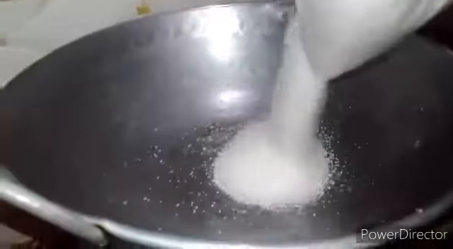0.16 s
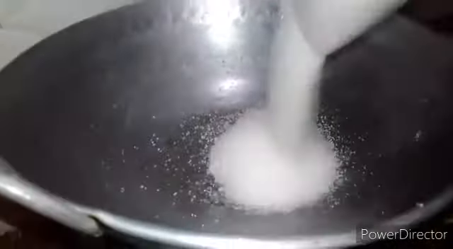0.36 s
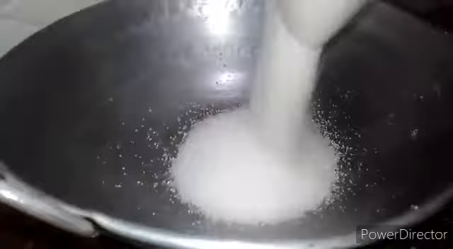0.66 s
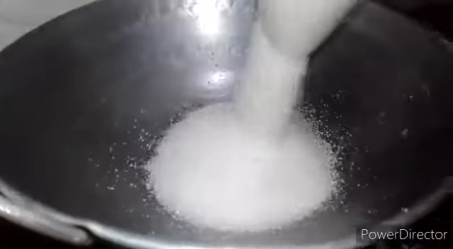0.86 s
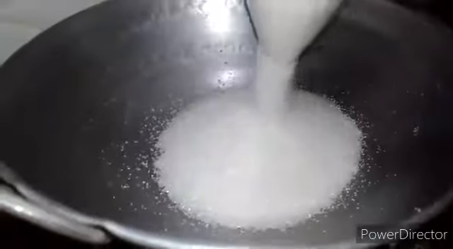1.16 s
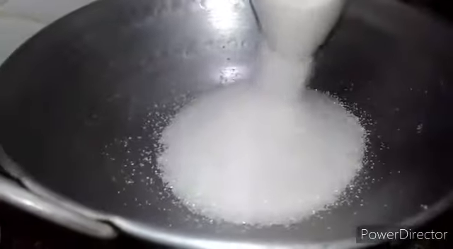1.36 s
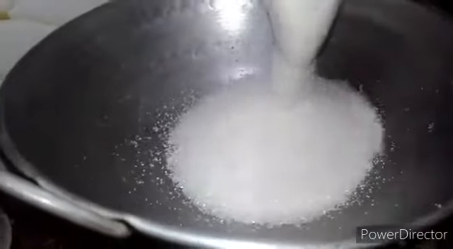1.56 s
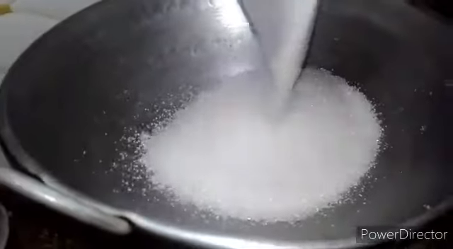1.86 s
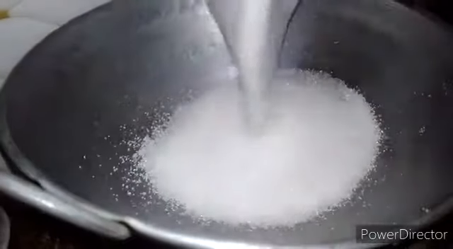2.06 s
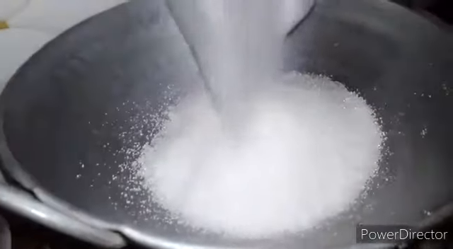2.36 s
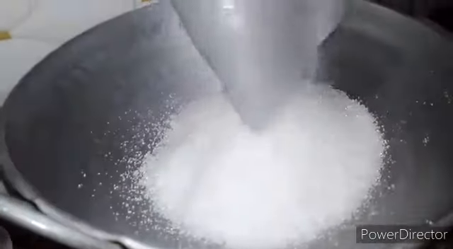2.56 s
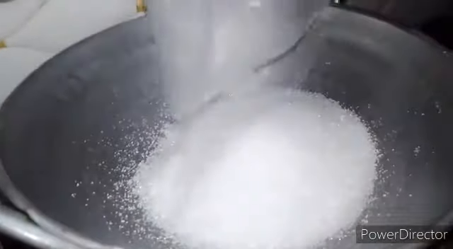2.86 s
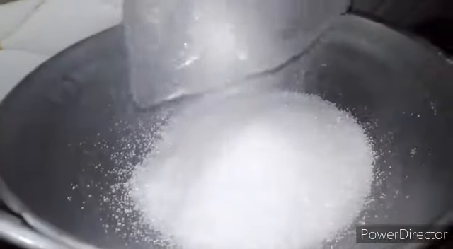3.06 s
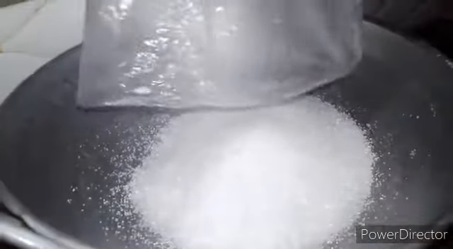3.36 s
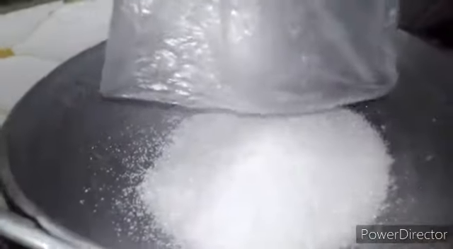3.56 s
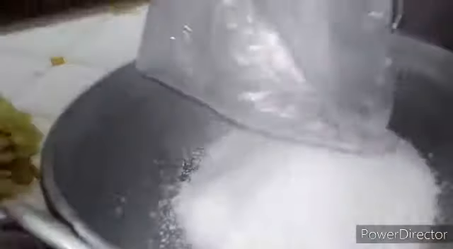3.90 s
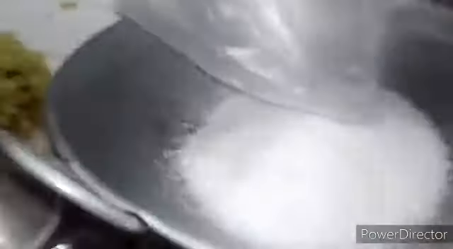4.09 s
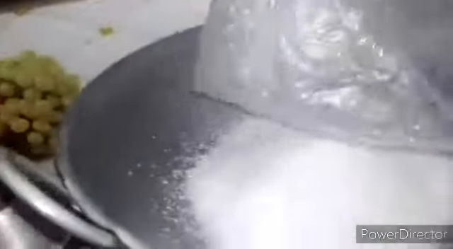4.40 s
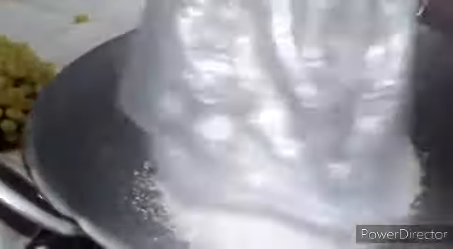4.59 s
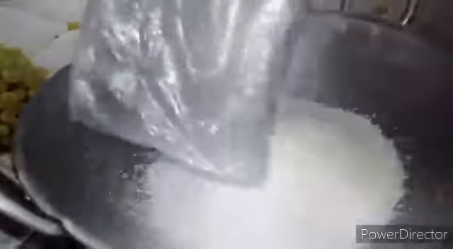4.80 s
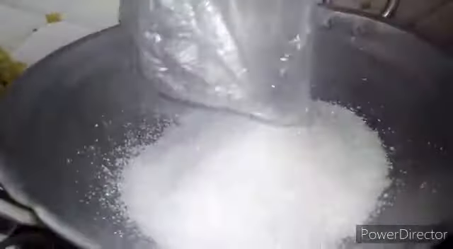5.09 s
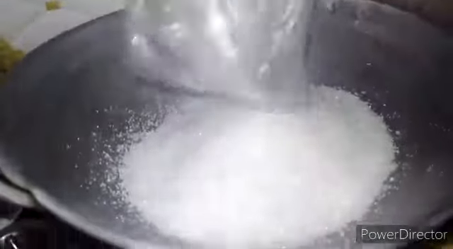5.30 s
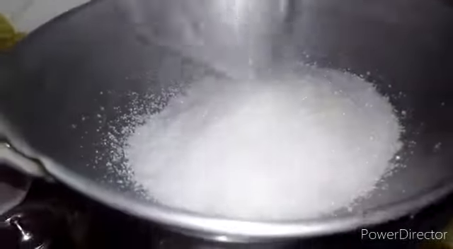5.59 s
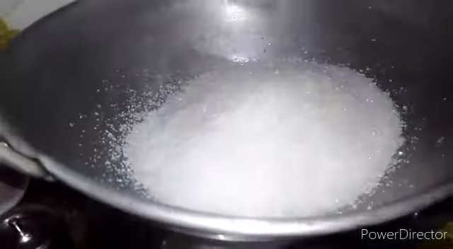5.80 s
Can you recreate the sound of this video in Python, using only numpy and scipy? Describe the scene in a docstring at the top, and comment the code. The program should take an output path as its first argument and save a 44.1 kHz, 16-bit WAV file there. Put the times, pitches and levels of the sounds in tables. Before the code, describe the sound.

In a small quiet kitchen, close to the microphone, granulated sugar is already running from a thin plastic bag into a steel wok. A bright, dense hiss of sliding grains sits over a drier patter and soft low thuds on the heap, with only a faint metallic ring. The flow eases until about 0.5 s, builds from 1 s and is fullest from roughly 1.5 to 2.6 s, with a sharp crease snap near 1.7 s. It then thins and nearly stops by 3.7 s, while the slack film starts to crackle. From 4.0 to 4.6 s the bag is shaken: sharp ringing plastic pops, a dull bump near 4.15 s and brief spurts. Fuller rushes follow around 4.75 and 5.0 s, slightly hollow inside the bag. From 5.4 s, short, lighter, grainier flicks and small crinkles fade toward the end at 6 s, over very faint background noise.

```python
"""A small kitchen, close to the microphone: granulated sugar runs from a thin plastic bag into a steel wok.
Showers of tiny random impacts, coloured by band, hiss over the film and patter on the heap and the pan.
Then the bag is shaken out in short spurts: bursts of noise snap its creases, and ringing crackles buckle
its film. The two microphone ports have opposite polarity, so the lows are inverted between left and right."""
import sys
import numpy as np
from scipy import signal
from scipy.fft import rfft, irfft, next_fast_len
from scipy.io import wavfile
from scipy.ndimage import uniform_filter1d

SR = 44100
rng = np.random.default_rng(int(sys.argv[2]) if len(sys.argv) > 2 else 0)


def put_to_file(sound):
    """Save the sound as 16-bit audio at rate SR, in the file named by the first command-line argument."""
    columns = np.atleast_2d(sound).T  # one column per channel
    safe = np.clip(columns, -1, 1)
    whole_steps = np.round(safe * 32767)
    wavfile.write(sys.argv[1], SR, whole_steps.astype(np.int16))


N = 262161


def undb(db):
    """Decibels to gain."""
    return 10 ** (np.asarray(db) / 20)


def unit(x):
    """Scale to rms 1."""
    return x / np.sqrt(np.mean(x ** 2))


def over_time(rows):
    """The columns of an (s, value, ..) table read at every sample."""
    s, *columns = np.transpose(rows)
    return [np.interp(np.arange(N) / SR, s, c) for c in columns]


def over_hz(points):
    """A (Hz, value) table read at every bin, straight on a log-frequency axis."""
    hz, value = np.transpose(points)
    bin_hz = np.fft.rfftfreq(next_fast_len(N), 1 / SR)
    return np.interp(np.log(bin_hz + 1), np.log(hz), value)


def shape(x, gain):
    """Filter by one gain per bin."""
    size = next_fast_len(N)
    return irfft(rfft(x, size) * gain, size)[:, :N]


def ring(x, response):
    """Pass both channels through an impulse response."""
    return signal.fftconvolve(x, np.atleast_2d(response), axes=-1)[:, :N]


def fade(t, t60):
    """Exponential decay, 60 dB down after t60."""
    return np.exp(-np.log(1000) * t / t60)


def walk(rate):
    """Random levels held 1 / rate s and slewed twice; spread near 1."""
    hold = max(int(SR / rate), 2)
    steps = np.repeat(rng.standard_normal(N // hold + 1), hold)
    slewed = uniform_filter1d(uniform_filter1d(steps, hold), hold)
    return unit(slewed[:N])


def impacts(rate, spread_db):
    """Two unrelated showers of tiny impacts, rate a second, mostly small and a few large."""
    hit = rng.random((2, N)) < rate / SR
    size = undb(spread_db * np.minimum(rng.exponential(size=(2, N)), 5))
    polarity = rng.choice([-1, 1], (2, N))
    return unit(hit * size * polarity / np.sqrt(rate))


def ports(pair, colour):
    """Colour two unrelated signals and share them between the ports: long waves reach both, in opposite polarity."""
    # Likeness of the two ports. Each row: frequency in Hz, correlation from -1 to 1.
    port_likeness = [(60, -1.1), (300, -0.88), (620, -0.85), (1360, -.5), (3000, -0.3), (6500, 0.09),
                     (14000, 0)]
    likeness = np.clip(over_hz(port_likeness), -.98, .98)
    mid, side = shape(pair, undb(over_hz(colour)) * np.sqrt([1 + likeness, 1 - likeness]))
    return unit(np.array([mid + side, mid - side]))


def wander(x, depth_db, rate, count=36):
    """Narrow bands waver in level at random, each on its own: they sink deep but swell little."""
    place = over_hz([(120, 0), (700, .25 * (count - 1)), (7000, count - 1)])  # Hz to band number
    out = 0
    for k in range(count):
        band = shape(x, np.maximum(1 - abs(place - k), 0))
        out = out + band * undb(depth_db * np.minimum(walk(rate), .5))
    return unit(out)


def kitchen():
    """Faint background: coloured noise, unrelated in the two ports, with a slightly wavering level."""
    # Colour of the background. Each row: frequency in Hz, level in dB.
    kitchen_colour = [(25, -17), (60, 5.5), (95, -3.5), (160, -3), (250, -8), (500, -12), (1000, -15),
                      (3000, -22), (10000, -4.5)]
    noise = shape(rng.standard_normal((2, N)), undb(over_hz(kitchen_colour)))
    return unit(noise) * undb(-52.0 + 0.28 * walk(6.5))


def room(x, t60, wet_db):
    """Early echoes from the bowl and the kitchen walls, as decaying noise that differs at each port."""
    t = np.arange(SR // 2) / SR
    tail = rng.standard_normal((2, len(t))) * fade(t, t60) * (t > .002)
    return x + undb(wet_db) * ring(x, tail / np.linalg.norm(tail[0]))


def bowl(x, lag_ms, sway, echo_db):
    """The curved steel throws the sound back; as the stream wanders the path changes, and the colour with it."""
    now = np.arange(N)
    lags = [lag_ms * SR / 1000 * (1 + sway * walk(4)) for _ in x]  # samples
    echo = np.array([np.interp(now - lag, now, channel) for lag, channel in zip(lags, x)])
    return x + undb(echo_db) * echo


def bumps():
    """Dull, quickly damped thuds mixed with a low rustle, stronger in one port."""
    # Soft bumps as the bag is handled or a heavy lump drops. Each row: start in seconds,
    # level in dB ahead of the port gains, pitch in Hz, t60 in seconds, share of rustle from 0 to 1.
    soft_bumps = [(0.069, -45, 75, 0.099, 0.1), (0.756, -50, 110, 0.1, 0.7), (1.42, -43, 130, 0.28, 0.7),
                  (1.499, -40, 119, 0.3, 0.3), (1.6, -43, 135, 0.25, 0.5), (2.3, -41, 70, 0.11, 0.2),
                  (4.154, -34, 102, 0.09, 0.15), (4.326, -42.5, 117.5, 0.19, 1), (4.38, -50, 89, 0.25, 0.5),
                  (4.437, -49, 130, 0.24, 0.7), (4.496, -47, 70, 0.25, 0.6), (5.706, -41, 287, 0.071, 0.6)]
    out, now = 0, np.arange(N) / SR
    low_band = signal.butter(2, [50, 380], "bandpass", fs=SR, output="sos")
    rustle = unit(signal.sosfilt(low_band, rng.standard_normal(N)))
    for s, db, hz, t60, share in soft_bumps:
        t = np.maximum(now - s, 0)
        envelope = (1 - fade(t, 0.0061)) * fade(t, t60)
        thud = (1 - share) * np.sin(2 * np.pi * hz * t) + share * rustle
        out = out + undb(db) * envelope * thud
    return out * np.array([[-.3], [1.4]])  # left, right


def buckles():
    """Loose panels of film buckle: short bursts of sparse crackles, each ringing around its own pitch."""
    # Panels of the slack film. Each row: middle in seconds, length in seconds, level in dB, pitch in Hz.
    panels = [(3.416, 0.047, -34, 2150), (3.441, .012, -30, 4400), (3.483, .01, -43, 3600),
              (3.544, 0.0082, -34.5, 2090), (3.634, .008, -41, 1980), (3.662, .005, -35, 5200),
              (3.707, .008, -39, 2220), (3.749, .008, -35, 3380), (3.792, 0.0065, -31, 1950),
              (3.845, 0.079, -39, 2060), (3.898, 0.016, -31, 5040), (4.02, 0.0056, -25, 5640),
              (4.04, 0.011, -30, 4540), (4.083, .012, -35, 2400), (4.165, 0.037, -29.5, 2150),
              (4.25, .008, -38, 5800), (4.35, 0.0088, -31, 5400), (4.367, .013, -31, 5400),
              (4.385, .015, -33, 5170), (4.408, 0.094, -40, 2350), (4.428, .01, -25.5, 5680),
              (4.466, .007, -31, 4550), (4.512, 0.011, -38, 2630), (4.571, 0.0088, -32, 2260),
              (4.584, .005, -24, 5790), (5.482, 0.011, -31.5, 3150), (5.508, .012, -37, 3750),
              (5.602, .008, -39, 3300), (5.614, .014, -35, 3200), (5.829, 0.024, -39, 3450),
              (5.857, 0.013, -37.5, 3550)]
    # Colour of the film's crackle. Each row: frequency in Hz, level in dB.
    film_colour = [(900, -27), (1900, -2), (3400, 6.5), (4500, 4), (7000, -3), (12000, -23)]
    panel_q, ring_s, dry_share = 8, .006, .15
    out, now = np.zeros((2, N)), np.arange(N) / SR
    crackle = ports(impacts(2200, spread_db=2.5), film_colour)
    for s, length, db, hz in panels:
        span = slice(int((s - length) * SR), int((s + length + ring_s) * SR))
        swell = np.exp(-(2 * (now[span] - s) / length) ** 2)
        burst = crackle[:, span] * swell
        resonance = signal.lfilter(*signal.iirpeak(hz, panel_q, fs=SR), burst)
        panel = unit(resonance + dry_share * burst)
        out[:, span] += undb(db) * panel * np.sqrt(np.mean(swell ** 2))
    return out


def bag(flow_db, slack):
    """The emptied film crinkles as it moves; larger creases snap as noise with a sharp decay and a weak tail."""
    # Creases snapping through. Each row: start in seconds, energy in dB ahead of the crease colour.
    crease_snaps = [(1.15, -1), (1.6874, 10), (3.064, 1), (3.223, -2), (3.5945, -3), (3.6878, -5.5),
                    (3.7533, -6), (3.969, -2), (4.018, 7.5), (4.582, 1.5), (4.644, -2), (5.107, -1),
                    (5.1755, -1), (5.231, -5), (5.3057, -8), (5.4596, -6), (5.52, -.5), (5.5352, -4),
                    (5.8464, -8), (5.8602, -3.5), (5.9345, -4.5)]
    # Colour of the creases. Each row: frequency in Hz, level in dB.
    crease_colour = [(1000, -51), (4300, -28), (5600, -8), (7500, 9.5), (9700, 8.5), (11500, 5),
                     (14300, -4.5)]
    crinkle = ports(impacts(450, spread_db=3.0), crease_colour)
    crinkle_db = flow_db - 13.5 + 3.3 * np.minimum(walk(45), 1)
    crinkle = crinkle * (0.35 + 0.6 * slack) * undb(crinkle_db)
    snaps = np.zeros((2, N))
    t = np.arange(SR // 30) / SR
    envelope = fade(t, .005) + undb(-15) * fade(t, .03)
    envelope = envelope / np.linalg.norm(envelope)
    for s, db in crease_snaps:
        snap = rng.standard_normal((2, len(t))) * envelope
        start = int(s * SR)
        snaps[:, start:start + len(t)] += undb(db) * snap[:, :N - start]
    return crinkle + shape(snaps, undb(over_hz(crease_colour)))


def wok(landing):
    """The steel bowl rings faintly under the landing grains, as a sum of decaying sines."""
    # Ring of the wok, damped by the sugar. Each row: frequency in Hz, level in dB, t60 in seconds.
    wok_modes = [(440, -13, 0.24), (1339, -3, 0.4), (2210, -13, 0.1), (2965, -2, .12), (3410, 2, 0.25),
                 (3564, 7, 0.14), (3892, 4, 0.28), (4775, -4, .1)]
    t = np.arange(SR // 2) / SR
    response = sum(undb(db) * np.sin(2 * np.pi * hz * t) * fade(t, t60) for hz, db, t60 in wok_modes)
    return ring(landing, response / np.linalg.norm(response))


def stream():
    """The pour and its spurts add in power: the flow over the film, and the load landing in the wok, both in dB."""
    # The stream as the bag is tipped, opened wide and runs empty. Each row: time in seconds, flow in dB.
    pour_curve = [(0, -20.5), (.17, -24), (.48, -27), (.77, -24.5), (1.08, -22.5), (1.36, -18),
                  (1.58, -11.5), (1.74, -11.5), (1.9, -16), (2.15, -12.5), (2.61, -13.5), (2.7, -16),
                  (3.0, -20), (3.35, -22.5), (3.48, -26.5), (3.61, -29), (3.67, -35.5), (3.75, -31)]
    # Spurts as the bag sags or is shaken. Each row: start, rise and hold in seconds, flow in dB,
    # weight in dB (how much harder than the plain stream the spurt lands).
    shaken_spurts = [(1.075, 0.15, 0.34, -30.5, 15), (2.774, 0.037, 0.52, -36, 15),
                     (3.715, 0.1, 0.16, -25.5, 0.5), (4.018, 0.055, 0.097, -20, 2),
                     (4.202, 0.051, 0.076, -29.5, 0), (4.316, 0.048, 0.077, -25.5, -1.5),
                     (4.502, 0.011, 0.21, -31.5, -2), (4.569, 0.1, 0.06, -22.5, 4.5),
                     (4.747, 0.054, 0.18, -19.5, 3), (4.974, 0.035, 0.024, -21.5, 3),
                     (5.066, 0.022, 0.14, -27.5, -1), (5.255, 0.011, 0.027, -33, -11),
                     (5.399, 0.012, 0.022, -29, -2.5), (5.45, 0.029, 0.025, -23.5, 0),
                     (5.564, 0.03, 0.034, -26, 1), (5.655, 0.039, 0.023, -26, 4),
                     (5.79, 0.032, 0.13, -33, -1.5)]
    # a spurt's decay grows with its rise: a sharp flick also stops sharply
    base_t60_s, t60_per_rise = 0.17, 5.8
    trickle_db = -50  # last stray grains
    now = np.arange(N) / SR
    pour_db, = over_time(pour_curve)
    pour = undb(pour_db) * fade(np.maximum(now - pour_curve[-1][0], 0), base_t60_s)
    flow = load = pour ** 2 + undb(trickle_db) ** 2
    for start, rise, hold, db, weight_db in shaken_spurts:
        t = now - start
        decay = fade(np.maximum(t - rise - hold, 0), base_t60_s + t60_per_rise * rise)
        spurt = np.clip(t / rise, 0, 1) * decay
        flow = flow + (spurt * undb(db)) ** 2
        load = load + (spurt * undb(db + weight_db)) ** 2
    return 10 * np.log10(flow), 10 * np.log10(load)


def sugar(flow_db, load_db, lift):
    """Grains slide over the film, land on the heap and ring the wok; a thin stream is grainier than a full one."""
    # Colours of the grains on the film, the light patter, the heap and the soft thuds.
    # Each row: frequency in Hz, level in dB.
    slide_colour = [(1500, -62), (3500, -12.5), (5000, -6), (6500, -5.5), (8000, -1.5), (9300, 1.9),
                    (10200, 1.4), (11200, -4.5), (12500, -6.5), (14300, -15.5)]
    patter_colour = [(500, -26), (900, -8.5), (1500, -5), (2000, -1.5), (2500, 0.5), (2950, 3.5), (4000, 1),
                     (5200, -2), (7000, -2), (12000, -52)]
    heap_colour = [(100, -28), (250, -6.5), (400, -3.5), (540, -8.5), (700, -4), (950, 2.5), (1150, -2),
                   (1500, -1), (2200, -9), (4000, -51)]
    thud_colour = [(25, -34), (60, -7), (110, -4), (160, 2.5), (210, -1.5), (300, 4), (450, -17),
                   (1000, -48)]
    # Where the bag's mouth hangs. Each row: time in seconds, left minus right in dB.
    mouth_place = [(.4, 1.5), (1.2, 0.2), (3.6, 0), (4.2, -1), (4.8, -0.5), (5.3, 4), (5.9, -0.5)]
    usual_flow_db = -20  # the flow at which the base levels below hold
    last_grain_share = .15  # the last shakes let only this share land, so grains are heard one by one
    # clumps make the patter flutter, more so in the last shakes
    clump_db, last_clump_db, clump_rate = .9, 2.6, 55  # depth, depth, clumps a second

    excess_db, weight_db = flow_db - usual_flow_db, load_db - flow_db
    grain_rate = np.clip(16000 * undb(.6 * excess_db), 3000, 30000)  # grains a second
    clumps = undb(0.077 * walk(35) + 0.5 * walk(220))  # the sugar leaves the bag in uneven lumps
    # base level, plus dB gained per dB of flow, plus the weight of the spurts
    patter_db = -28.5 + excess_db + 0.84 * weight_db  # the light patter takes only part of the weight
    heap_db = -42 + 0.82 * excess_db + weight_db
    thud_db = -52 + 0.93 * excess_db + weight_db

    pan_db, = over_time(mouth_place)
    slide_db = flow_db - 0.66 + .5 * walk(28.35) + np.array([pan_db, -pan_db]) / 2
    slide = ports(impacts(grain_rate, spread_db=2.5), slide_colour) * undb(slide_db)

    landing = impacts(grain_rate * last_grain_share ** lift, spread_db=2.5)
    flutter_db = (clump_db + (last_clump_db - clump_db) * lift) * np.minimum(walk(clump_rate), 1)
    patter = wander(ports(landing, patter_colour), depth_db=5.0, rate=22) * undb(patter_db + flutter_db)

    heap = ports(impacts(.5 * grain_rate, spread_db=2.5), heap_colour)
    heap = wander(heap, depth_db=5.0, rate=20, count=20)
    heap = heap * undb(heap_db + 2.2 * np.minimum(walk(16), .7))

    lumps = ports(impacts(260, spread_db=1.0), thud_colour)
    lumps = wander(lumps, depth_db=8.0, rate=20, count=16)
    thuds = lumps * undb(thud_db + 3.1 * np.minimum(walk(20), .5))  # whole lumps land softly
    return (slide + patter + heap) * clumps + thuds + wok(landing * undb(patter_db - 18.5))


def inside_bag(pour, opened, lift):
    """The empty bag's resonances and notches colour the pour, crossfading as the bag changes its form."""
    # The bag hanging flat and wide in the bowl, shaken open into a tube, then raised and pulled narrow.
    # Each row: frequency in Hz, gain in dB.
    flat_colour = [(120, 4), (300, -3.5), (430, 5), (660, 2), (800, 1.5), (950, -0.5), (1170, -7),
                   (1380, -1.5), (1570, -1), (2100, 4), (2700, -5), (3400, -0.5), (5000, 0), (7000, 1.5)]
    tube_colour = [(120, 1), (300, -2.5), (430, 4), (660, 6), (800, 2), (950, 5.5), (1170, -6), (1380, -2),
                   (1570, 1), (2100, 0), (2700, -2.5), (3400, -3.5), (5000, 0), (7000, 2)]
    lifted_colour = [(120, 1), (290, 9), (430, -0.5), (680, 5), (820, -5), (950, 0), (1380, -6), (1900, 1),
                     (2800, -3), (3300, -1.5), (4400, -2), (5100, -6), (7000, 1)]
    colours = (flat_colour, tube_colour, lifted_colour)
    flat, tube, lifted = (shape(pour, undb(over_hz(colour))) for colour in colours)
    return (1 - lift) * ((1 - opened) * flat + opened * tube) + lift * lifted


def scene():
    """The pour and the bag in the kitchen, over its faint background."""
    flow_db, load_db = stream()
    # each pair: time in seconds, share from 0 to 1
    slack, = over_time([(3.1, 0.21), (3.6, 0.96)])  # the bag empties and drops into the bowl
    opened, = over_time([(4.3, 0.45), (4.65, 0.95)])  # it is shaken open
    lift, = over_time([(5.2, 0.01), (5.45, 0.97)])  # then it is raised for the last shakes
    pour = sugar(flow_db, load_db, lift)
    pour = (1 - slack) * pour + slack * inside_bag(pour, opened, lift)
    echoed = bowl(pour, lag_ms=1.6, sway=.15, echo_db=-9)
    near = echoed + buckles() + bag(flow_db, slack) + bumps()
    return room(near, t60=.25, wet_db=-15) + kitchen()


def record(dry):
    """The ports differ a little in colour; peaks stop at full scale and the top is cut."""
    # Mismatch of the ports. Each row: frequency in Hz, left minus right in dB.
    port_mismatch = [(100, -1), (650, 0.3), (1250, -2), (2300, -3.5), (4300, -1), (6500, -5.5), (9000, 2),
                     (14000, 2)]
    heard = shape(dry, undb(over_hz(port_mismatch) * np.array([[.5], [-.5]])))
    top_cut = signal.ellip(14, .1, 80, 14400, fs=SR, output="sos")  # low-pass edge in Hz
    return signal.sosfilt(top_cut, np.clip(heard, -1, 1))


dry = scene()
out = record(dry)
put_to_file(out)
```